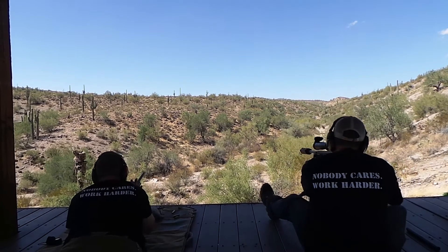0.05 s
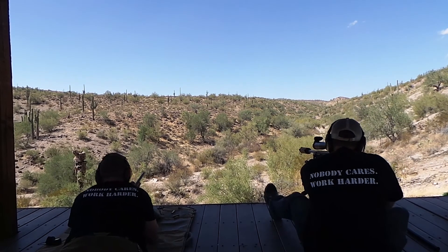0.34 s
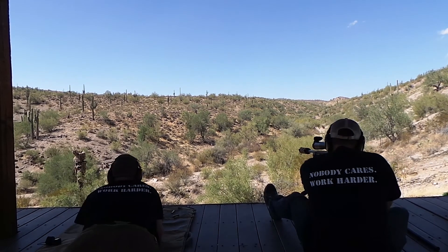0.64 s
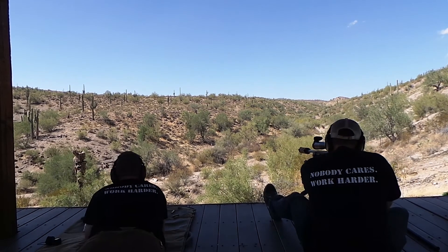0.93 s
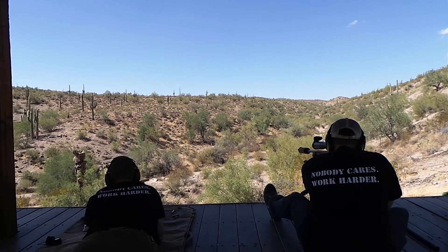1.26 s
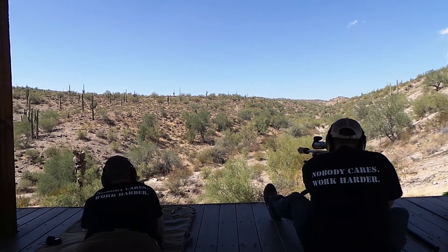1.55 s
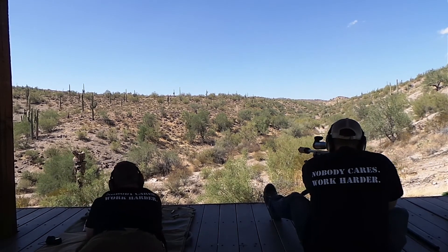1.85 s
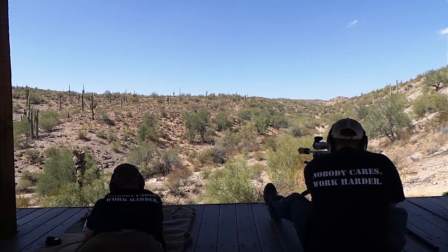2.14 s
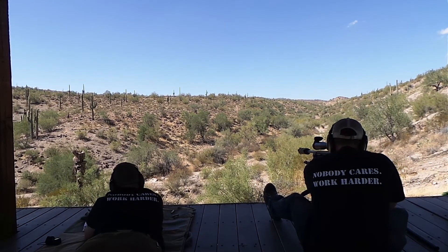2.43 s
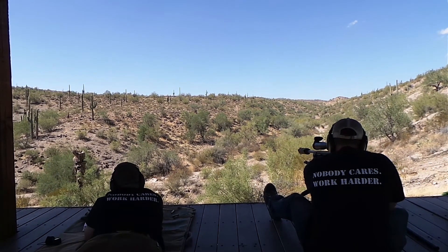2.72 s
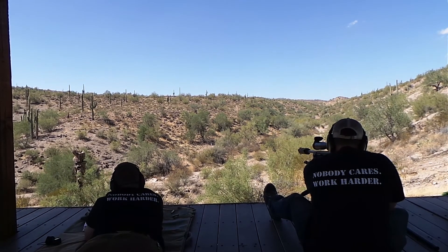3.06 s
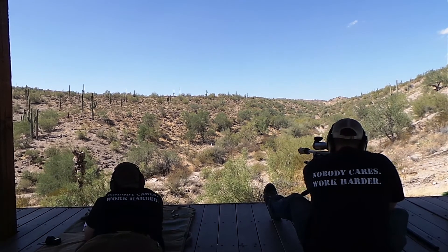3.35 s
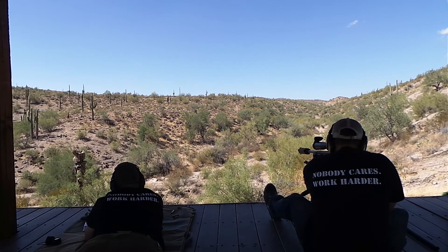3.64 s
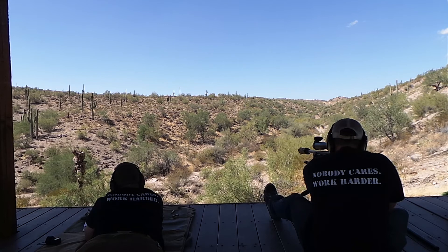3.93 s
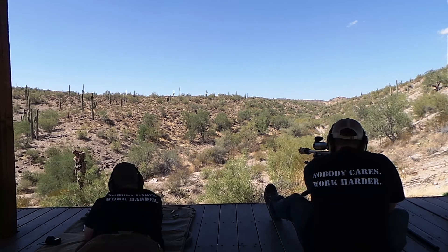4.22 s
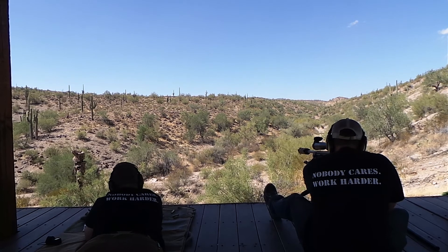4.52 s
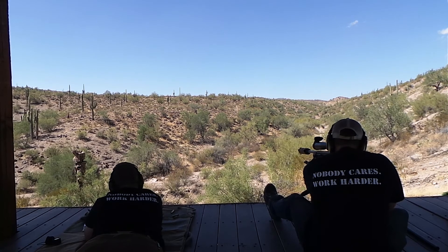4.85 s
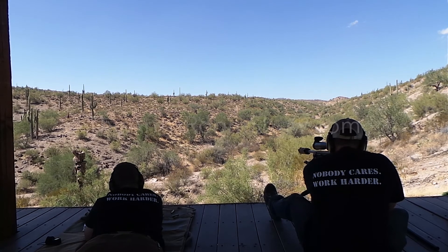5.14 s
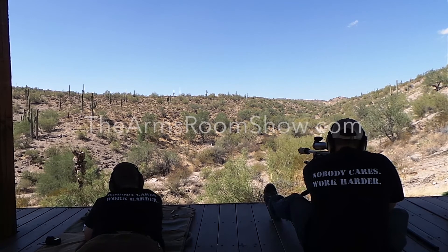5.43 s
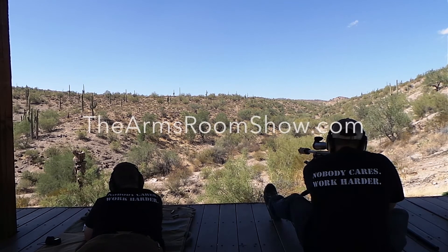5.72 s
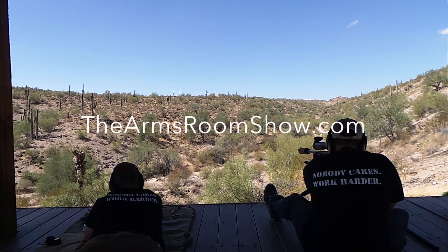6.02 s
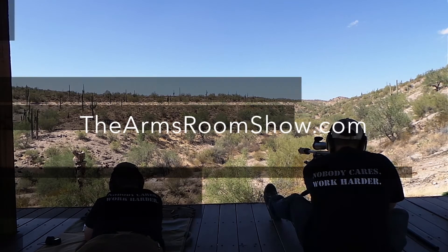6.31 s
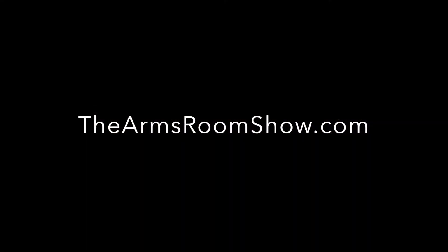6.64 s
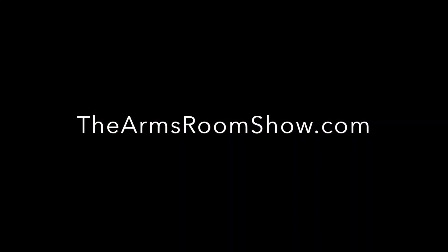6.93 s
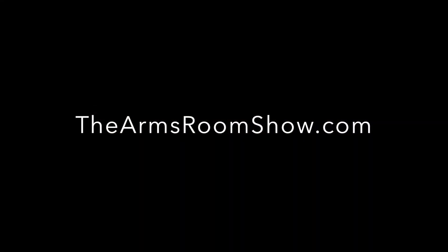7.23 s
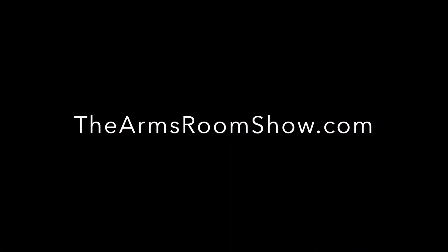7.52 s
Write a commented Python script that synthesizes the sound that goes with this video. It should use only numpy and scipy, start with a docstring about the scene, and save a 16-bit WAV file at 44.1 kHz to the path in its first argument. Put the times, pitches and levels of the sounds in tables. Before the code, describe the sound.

In the first half second a rifle bolt is worked shut close by, with gritty metal clacks and a thin ping, followed by very faint clothing rustle and scraping. At about 1.9 seconds a loud, sharp rifle shot overloads the microphone and booms under the deck roof. A fine crackle returns from the brush, and at 2.3 seconds a distant steel plate gives a slap and a short ring. Echoes scatter back from the valley slopes, growing duller as they fade. At 4.1 seconds comes a second shot, just as loud but deeper, with a fuller rolling echo, and the plate slaps and rings again at 4.5 seconds. Around 5 seconds a gust of wind thumps on the microphone, then flutters in softer low rumbles over the dying echo. The sound fades out by about 7.2 seconds.

```python
"""A roofed wooden deck above a desert valley: a bolt is worked shut, then two rifle shots.
Each blast overloads the microphone, booms under the roof and scatters back from the slopes, duller
with distance. The bullet's crack returns from the brush; 0.4 s after the shot comes the slap and ring
of a far steel plate. Light wind buffets the microphone."""
import sys
import numpy as np
from scipy import signal
from scipy.fft import rfft, irfft, next_fast_len
from scipy.io import wavfile
from scipy.ndimage import uniform_filter1d

SR = 44100
rng = np.random.default_rng(int(sys.argv[2]) if len(sys.argv) > 2 else 0)


def materialize(psi):
    """Save the field psi as 16-bit PCM at rate SR to the path in sys.argv[1].

    A 1-D psi becomes a single channel; in a 2-D psi each row is a channel.
    """
    bounded = np.clip(np.atleast_2d(psi).T, -1, 1)
    quanta = np.round(bounded * 32767).astype(np.int16)
    wavfile.write(sys.argv[1], SR, quanta)


N = 338247
T = np.arange(N) / SR
FREQS = np.maximum(np.arange(N // 2 + 1) * SR / N, 1)


# shots: start_s, blast_db, rattle_s, rattle_fall_db_per_s, escape_db_per_s, boom_db, boom_fall_db_per_s
SHOTS = [(1.908, 14, 0.039, 234, 901, -16.5, 38), (4.105, 16, 0.095, 171.5, 988.5, -11.5, 32.5)]
# blast spectrum, one per shot: freq_hz, gain_db
BLAST_COLOURS = [
    [(30, -15), (100, -11), (220, 7.5), (450, -6.5), (1500, -8), (3500, -2.5), (7000, -1), (14000, -9)],
    [(30, -11), (90, -6.5), (200, 4), (450, -4.5), (900, -1.5), (2000, -7.5), (5000, -15.5), (14000, -23.5)],
]
# roof resonances: pitch_hz, width_hz, gain_db
ROOF_MODES = [(218, 41, 4), (163, 8, -1.5), (290, 90, -19)]

def muzzle_blast(shot, spectrum):
    """The blast rattles between deck and roof and escapes; their low resonances boom on."""
    start, blast_db, rattle_s, rattle_fall, escape, boom_db, boom_fall = shot
    envelope = burst(start, rattle_fall, .004) * undb(-np.clip(escape * (T - start - rattle_s), 0, 200))
    blast = undb(blast_db) * noise(colour(spectrum, FREQS)) * envelope
    boom = undb(boom_db) * noise(resonances(ROOF_MODES)) * burst(start, boom_fall, .005)
    return blast + boom


# valley returns, one row per shot: level_db, fall_db_per_s, extra_far_fall_db_per_s
RETURNS = [(-15.5, 32, 48), (-11.5, 29, 20)]
# strong reflectors: round_trip_s, spread_s, gain_db
HILLSIDES = [(0.499, .06, 3.5), (1.06, 0.063, 3), (1.36, 0.057, 3.5), (1.63, 0.033, 11)]

def valley_envelope(start, returns, head_round_trip_s=1.387):
    """Returns weaken with distance, swell at each hillside and thin out past the head of the valley."""
    db, fall, far_fall = returns
    hills_db = sum(gain_db * swell(start + trip, spread) for trip, spread, gain_db in HILLSIDES)
    return undb(db + hills_db) * burst(start, fall, .03) * held(start, head_round_trip_s, .089, far_fall)


# echo spectrum before air loss, one per shot: freq_hz, gain_db
ECHO_COLOURS = [
    [(30, -18), (110, -0.5), (220, -6), (450, -3), (900, -5), (1900, -2.5), (3300, -4), (6000, -4),
     (9500, -3.5), (13000, -22)],
    [(30, -19), (110, 1), (220, 4.5), (450, 5.5), (900, -2), (1900, -2.5), (3300, -6), (6500, -7.5),
     (9500, -13.5), (13000, -34)],
]
AIR_LOSS_5KHZ_DB_PER_S, AIR_LOSS_EXPONENT = 22.5, 1.6

def valley_echoes(start, returns, spectrum):
    """Countless small echoes from rocks and brush; later ones have lost more treble to the air."""
    size = 3 * 2 ** 16
    span = slice(int(start * SR), int(start * SR) + size)
    age = T[span] - start
    scatter = rng.standard_normal(N) * undb(1.3 * walk(500) + .6 * walk(45))
    bins = rfft(scatter[span], size)
    octave = np.log2(np.maximum(np.arange(len(bins)) * SR / size, 1))
    echo, mid_power = 0, 0
    for hz in 31.25 * 2 ** np.arange(0, 9.1, .5):
        window = np.maximum(1 - 2 * np.abs(octave - np.log2(hz)), 0)
        band = irfft(bins * window, size)[:len(age)]
        air_loss_db = AIR_LOSS_5KHZ_DB_PER_S * age * (hz / 5000) ** AIR_LOSS_EXPONENT
        gain = colour(spectrum, hz) * undb(-air_loss_db)
        echo += gain * band
        mid_power += gain ** 2 * np.var(band) * (700 < hz < 4100)
    out = np.zeros(N)
    out[span] = echo / np.sqrt(mid_power)  # the mid band carries the level
    return out * valley_envelope(start, returns)


# bullet strikes: start_s, slap_db, spray_db, spray_s, ring_db
STRIKES = [(2.299, 7.013, -13, 0.13, -18.5), (4.4959, 7.998, -14.5, 0.1, -13)]
# slap and spray spectrum: freq_hz, gain_db
STRIKE_COLOUR = [(40, -23), (200, 1), (500, 5), (800, 5.5), (2000, -2.5), (4000, -10), (8000, -21),
                 (14000, -67.5)]
# plate modes, driven differently at each impact point: pitch_hz, t60_s, first_hit_db, second_hit_db
PLATE_MODES = [(626, 0.89, -5, -22), (1452, 0.44, 2.5, -13), (1513, 0.54, -21.5, -5),
               (1736, 0.68, -10, -5.5), (2090, 0.59, -20.5, -10), (2620, 0.64, -3.5, -9),
               (3330, 0.37, -1.5, 1.5), (3639, 0.45, -11, -22), (4320, 0.76, -11, -20),
               (4914, .45, -10, -27), (4950, .35, -13.5, -11.5), (5270, 0.36, -24.5, -11.5),
               (5335, 0.94, -19.5, -27), (6160, 0.33, -3.5, -12.5), (7230, 0.45, -26.5, -22)]

def steel_plate(hit):
    """The bullet slaps the steel, fragments spray the bank behind it and the plate rings on."""
    start, slap_db, spray_db, spray_s, ring_db = STRIKES[hit]
    modes = [(hz, hit_db[hit], t60) for hz, t60, *hit_db in PLATE_MODES]
    tone = colour(STRIKE_COLOUR, FREQS)
    slap = undb(slap_db) * noise(tone) * burst(start, 2300, .0002)
    settling = undb(-110 * np.clip(T - start - spray_s, 0, 1))
    spray = undb(spray_db) * noise(tone) * burst(start + .0065, 40, .0089) * settling
    steel = undb(ring_db) * ring(modes, start + .02, waver_db=2, echo_db=-21.5)
    return slap + spray + steel * burst(start + .019, 0, .016)


def slap_dip(start, depth_db=-13, delay_s=.0145, width_s=.0024):
    """The level dips briefly just after a slap."""
    return undb(depth_db * swell(start + delay_s, width_s))


# crack returned by the brush, one row per shot: level_db, growth_db_per_s
CRACKLES = [(-15, -29), (-25, 29.5)]
# snap spectrum: freq_hz, gain_db
CRACKLE_COLOUR = [(300, -40), (1000, -13.5), (1700, 0.5), (2600, 2.5), (4000, -3), (5500, -14),
                  (8500, -16.5), (12000, -45.5)]

def bullet_crackle(start, stop, db, growth, rise_s=.14, fall_db_per_s=290.5):
    """Each bush and cactus returns the supersonic crack as a tiny snap, until the bullet stops."""
    flight_s = np.clip(T, start, stop) - start
    envelope = burst(start, 0, rise_s) * held(start, stop - start, rise_s, fall_db_per_s)
    snaps = noise(colour(CRACKLE_COLOUR, FREQS)) * undb(.72 * walk(600) + 2.6 * walk(60))
    return snaps * envelope * undb(db + growth * (flight_s - rise_s))


# bolt clacks and knocks: start_s, level_db, t60_s, tilt_db_per_octave, corner_hz, relative_ping_db
CLACKS = [(0.047, -44, 0.59, 4, 12000, 17.5), (0.0523, -49, 0.13, 9, 14000, 5),
          (0.102, -39.5, 0.66, 3, 9100, -20), (0.111, -31.5, 0.47, 3, 9000, -20),
          (0.146, -22, 0.12, 3, 12000, -22.5), (0.154, -21.5, 0.17, 3, 14100, -31),
          (.283, -38, 0.17, 4, 11800, -27.5), (.329, -36.5, 0.2, 1.5, 11000, -27),
          (0.613, -42, 0.088, 1, 3880, -40.5), (.978, -63.5, 0.14, 0.5, 4000, -40.5)]
# bolt contact spectrum: freq_hz, gain_db
BOLT_COLOUR = [(100, -29), (300, -10), (550, -4.5), (900, -7.5), (1500, -10), (2400, -8.5), (5300, -13),
               (13000, -19.5), (15000, -34.5)]
# bolt ping: pitch_hz, level_db, t60_s
BOLT_MODES = [(5655, -6, 0.24), (5616, 0.5, .12), (5790, -6, 0.064)]
# hollow rifle resonances: pitch_hz, width_hz, gain_db
RIFLE_MODES = [(810, 77, 5.5), (1510, 570, -8.5), (4287, 300, -25.5)]
# clothes rubbing: start_s, length_s, level_db
RUSTLES = [(0.016, 0.33, -52), (0.562, 0.25, -59), (1.306, 0.22, -70), (1.545, 0.19, -63), (2.8, .5, -66),
           (5.2, 1.35, -70)]
# rifle on its rest: centre_s, half_length_s, level_db
SCRAPES = [(1.236, 0.017, -55), (1.346, 0.038, -51.5), (1.417, .025, -56)]

def rifle_handling():
    """The bolt locks in gritty clacks with a thin ping; clothes rustle; the rifle scrapes its rest."""
    body = resonances(RIFLE_MODES)
    tone = colour(BOLT_COLOUR, FREQS) * (1 + .75 * body)
    grit = undb(2 * walk(700))
    rubbing = sum(undb(db) * held(start, length, .043, 219.5) for start, length, db in RUSTLES)
    sliding = sum(undb(db) * swell(centre, width) for centre, width, db in SCRAPES)
    cloth_tone = tone * undb(-.4 * np.log2(FREQS))  # duller than steel
    rustle = rubbing * noise(cloth_tone) * undb(2 * walk(42))
    scrape = sliding * noise(body + .19 * tone) * grit
    out = rustle + scrape
    age = T[:SR // 2]
    for start, db, t60, tilt, corner_hz, ping_db in CLACKS:
        span = slice(int(start * SR), int(start * SR) + len(age))
        contact = tone * undb(tilt * np.log2(FREQS))
        contact /= 1 + (FREQS / corner_hz) ** 4  # softer contact, less treble
        out[span] += undb(db) * noise(contact, len(age)) * grit[span] * undb(-60 * age / t60)
        out += undb(db + ping_db) * ring(BOLT_MODES, start)
    return out


# gusts over the deck: peak_s, level_db
GUSTS = [(.05, -59.5), (3.201, -62.5), (5.15, -32.5)]
GUST_RISE_DB_PER_S, GUST_FALL_DB_PER_S = 37.5, 14
# single eddies: centre_s, peak_db
BUFFETS = [(.56, -51), (.77, -46), (1.162, -42.5), (1.555, -37), (1.673, -45), (3.302, -40.5),
           (3.57, -43.5), (4.992, -19.5), (5.154, -7), (5.191, -14), (5.508, -24.5), (5.58, -23.5),
           (5.711, -22.5), (5.749, -22.5), (5.904, -23), (6.01, -33.5), (6.077, -31.5), (6.158, -31),
           (6.392, -29), (6.571, -30), (6.89, -32.5)]
# brisk gust spectrum: freq_hz, gain_db
WIND_COLOUR = [(25, -18.5), (70, -3), (140, 2), (240, -6), (400, -23), (1000, -56), (4000, -79)]
# distant roar spectrum: freq_hz, gain_db
ROAR_COLOUR = [(200, -6), (450, 5), (1000, -10.5), (2500, -23), (6000, -36.5)]

def wind(calm_db=-70, gentle_db=-50, brisk_db=-28, flutter_db=4):
    """Gusts flutter and thump on the microphone; a faint, low, distant roar swells and fades with them."""
    gentle = noise(colour(WIND_COLOUR, FREQS * 1.5))  # slow air rumbles lower
    brisk = noise(colour(WIND_COLOUR, FREQS))
    gusts_db = [db - np.maximum(GUST_RISE_DB_PER_S * (peak - T), GUST_FALL_DB_PER_S * (T - peak))
                for peak, db in GUSTS]
    wind_db = np.maximum(np.max(gusts_db, axis=0), calm_db)
    briskness = np.clip((wind_db - gentle_db) / (brisk_db - gentle_db), .05, 1)
    eddies = np.sqrt(1 - briskness) * gentle + np.sqrt(briskness) * brisk
    rumble = eddies * undb(wind_db + flutter_db * walk(24))
    for centre, db in BUFFETS:
        width_s = .014 * np.exp(-(db + 25) / 63)  # strong eddies pass faster
        puff = eddies * swell(centre, width_s)
        rumble += undb(db) * puff / np.abs(puff).max()
    roar = noise(colour(ROAR_COLOUR, FREQS)) * undb(-41.5 + .45 * wind_db + 1.7 * walk(15))
    return rumble + roar


# still air spectrum: freq_hz, gain_db
DESERT_COLOUR = [(25, -1.5), (100, -5.5), (300, -11.5), (1000, -21), (3000, -33), (8000, -33),
                 (15000, -38.5)]

def desert_air(level_db=-64.5):
    """Faint, steady hush of still air."""
    return undb(level_db) * noise(colour(DESERT_COLOUR, FREQS))


def undb(db):
    """Decibels to gain."""
    return np.exp(np.asarray(db) * (np.log(10) / 20))


def unit(x):
    """Scale to rms 1."""
    return x / np.sqrt(np.mean(x ** 2))


def colour(points, hz):
    """Gain at hz from (freq_hz, gain_db) points."""
    at, db = np.transpose(points)
    return undb(np.interp(np.log(hz), np.log(at), db))


def resonances(modes):
    """Gain over FREQS from (pitch_hz, width_hz, gain_db) peaks."""
    return sum(undb(db) / (1 + ((FREQS - hz) / (width / 2)) ** 2) for hz, width, db in modes)


def noise(gain, count=N):
    """Noise of rms 1, shaped by a gain over FREQS."""
    size = next_fast_len(count, True)
    gain = np.interp(np.arange(size // 2 + 1) * SR / size, FREQS, gain)
    return unit(irfft(rfft(rng.standard_normal(size)) * gain, size)[:count])


def walk(rate_hz):
    """Smoothed random levels, rms 1."""
    step = int(SR / rate_hz)
    levels = np.repeat(rng.standard_normal(N // step + 1), step)[:N]
    return unit(uniform_filter1d(levels, step))


def burst(start, fall_db_per_s, rise_s):
    """Envelope: linear rise, exponential fall."""
    age = np.maximum(T - start, 0)
    return np.minimum(age / rise_s, 1) * undb(-np.minimum(fall_db_per_s * age, 200))


def held(start, length_s, rise_s, fall_db_per_s):
    """Envelope: rise, hold until length_s, fall."""
    return burst(start, 0, rise_s) * undb(-np.clip(fall_db_per_s * (T - start - length_s), 0, 200))


def swell(centre, width_s):
    """Bell envelope, width_s to either side."""
    return np.exp(-np.minimum(((T - centre) / width_s) ** 2, 20))


def ring(modes, start, waver_db=0, echo_db=-80):
    """Struck modes die away; many paths make each waver, and late echoes let it linger."""
    age, out = T[:SR], np.zeros(N)
    for hz, db, t60 in modes:
        envelope = undb(-60 * age / t60) + undb(echo_db - 55 * age)
        waver = np.interp(age, np.linspace(0, 1, 60), rng.standard_normal(60))
        tone = np.sin(2 * np.pi * (hz * age + rng.random()))
        out[int(start * SR):][:SR] += undb(db + waver_db * waver) * envelope * tone
    return out


# left-right part of each blast: relative_db, length_s
BLAST_SIDES = [(-14, .055), (-19.5, 0.043)]

def scene():
    """Stereo mix; only the first, close rattle of each blast differs between the microphone ports."""
    mid, side = 0, 0
    for k, shot in enumerate(SHOTS):
        fired_s, hit_s = shot[0], STRIKES[k][0]
        mid += muzzle_blast(shot, BLAST_COLOURS[k])
        mid += valley_echoes(fired_s, RETURNS[k], ECHO_COLOURS[k])
        mid += bullet_crackle(fired_s, hit_s, *CRACKLES[k])
        mid += steel_plate(k)
        side_db, side_s = BLAST_SIDES[k]
        side += undb(side_db) * muzzle_blast(shot, BLAST_COLOURS[k]) * held(fired_s, side_s, .0023, 2500)
    for hit_s, *_ in STRIKES:
        mid *= slap_dip(hit_s)
    mid += rifle_handling() + wind() + desert_air()
    return np.array([mid + side, mid - side])


def record(dry, ceiling=.88, knee=.5, hold_s=.071, top_hz=14800, fade_end_s=7.206, fade_s=.95):
    """The input clips hard, gain control eases the overload down, and the sound fades out."""
    clipped = dry / (1 + (dry / ceiling) ** 8) ** (1 / 8)
    pole = np.exp(-1 / (hold_s * SR))
    loudness = signal.lfilter([1 - pole], [1, -pole], np.abs(clipped).mean(axis=0))
    gain = 1 / np.sqrt(1 + (loudness / knee) ** 4)
    fade = np.clip((fade_end_s - T) / fade_s, 1e-4, 1) ** .83
    lowpass = signal.ellip(8, .2, 70, top_hz, fs=SR, output="sos")
    return signal.sosfilt(lowpass, clipped * gain * fade)


dry = scene()
out = record(dry)
materialize(out)
```